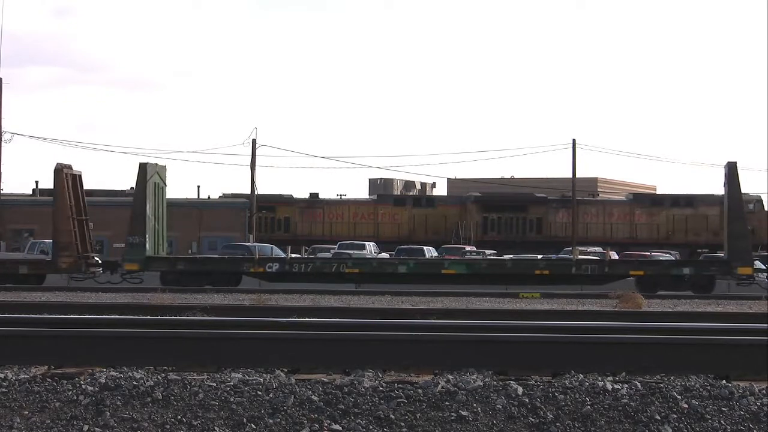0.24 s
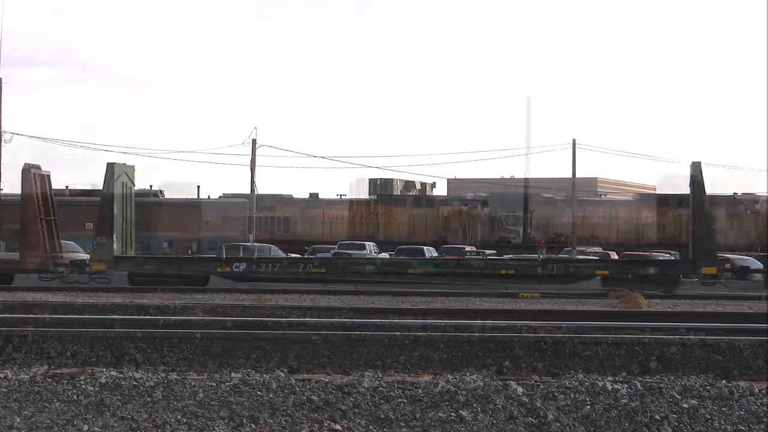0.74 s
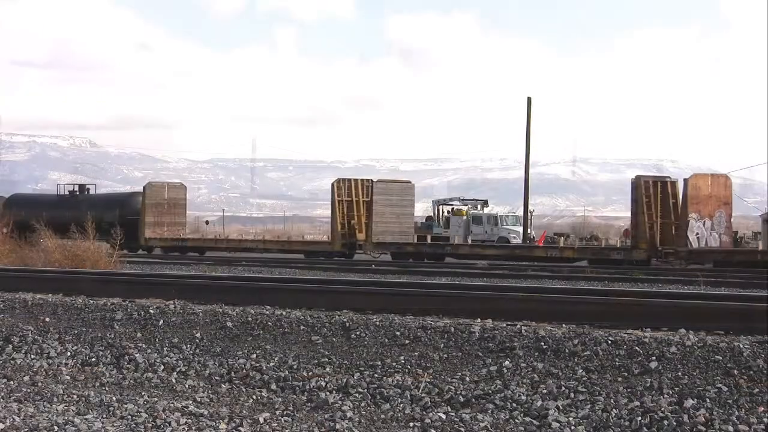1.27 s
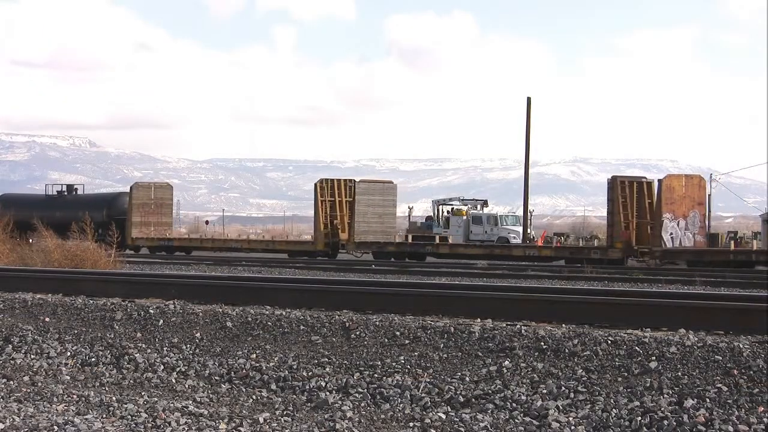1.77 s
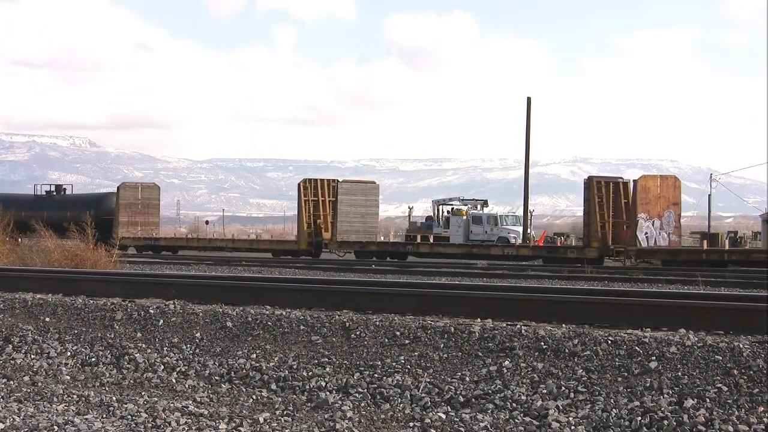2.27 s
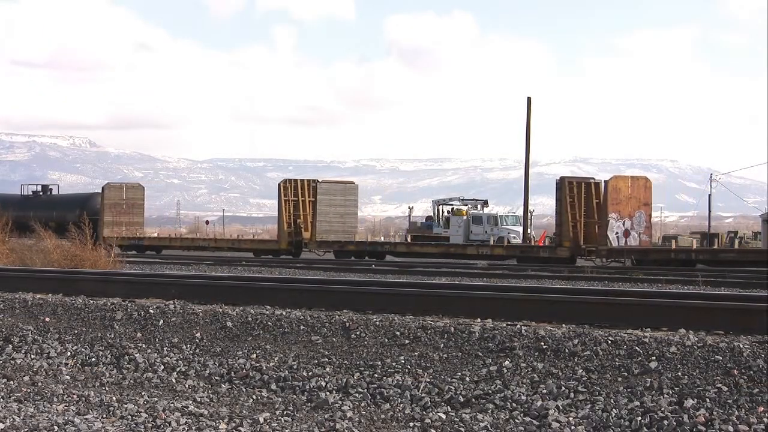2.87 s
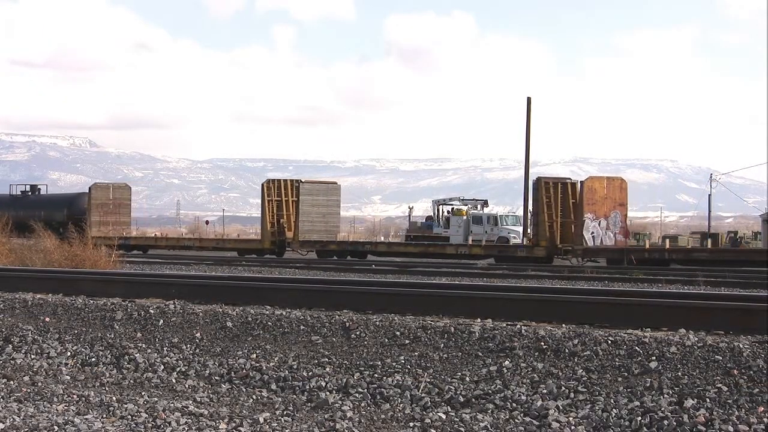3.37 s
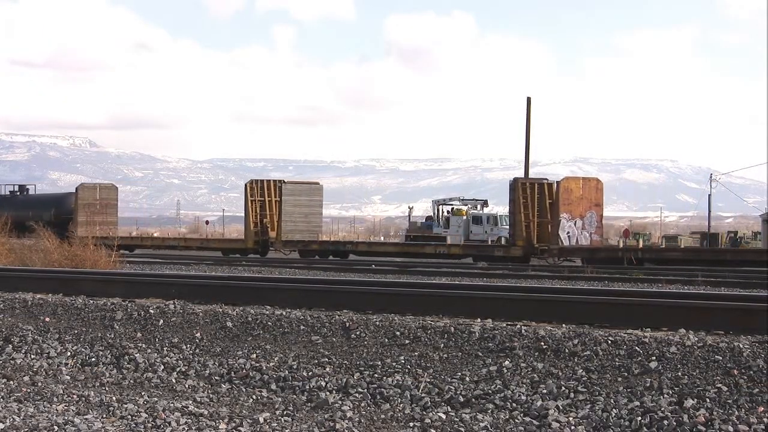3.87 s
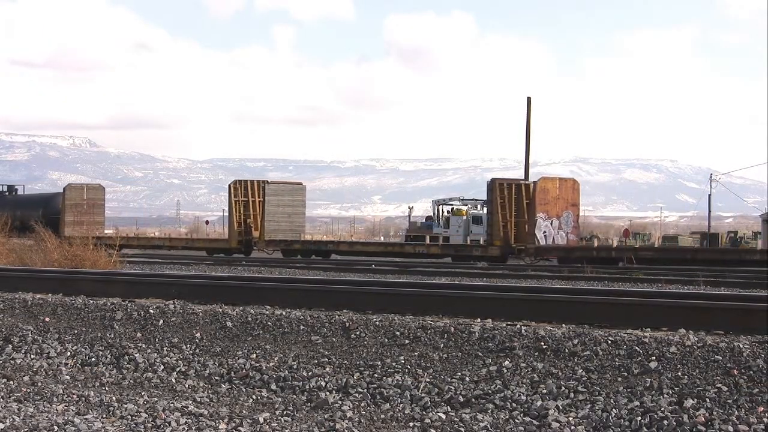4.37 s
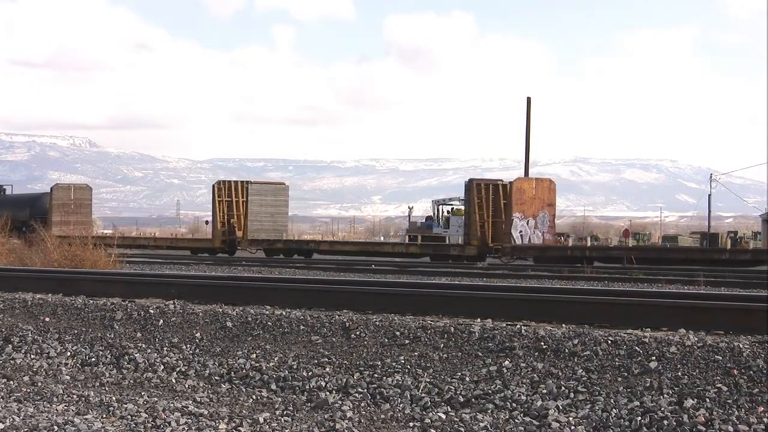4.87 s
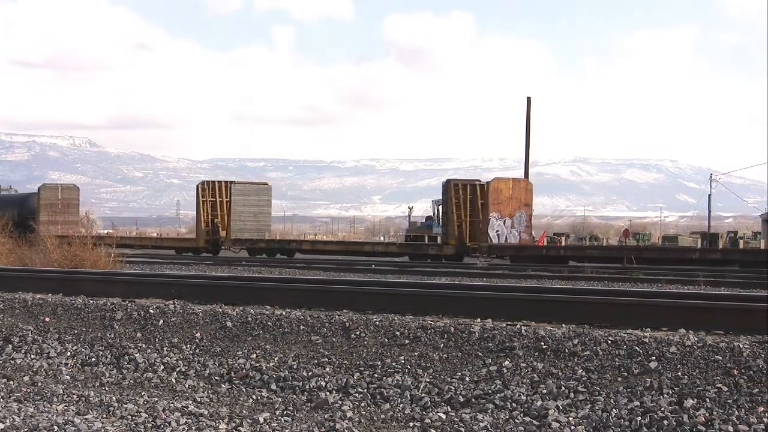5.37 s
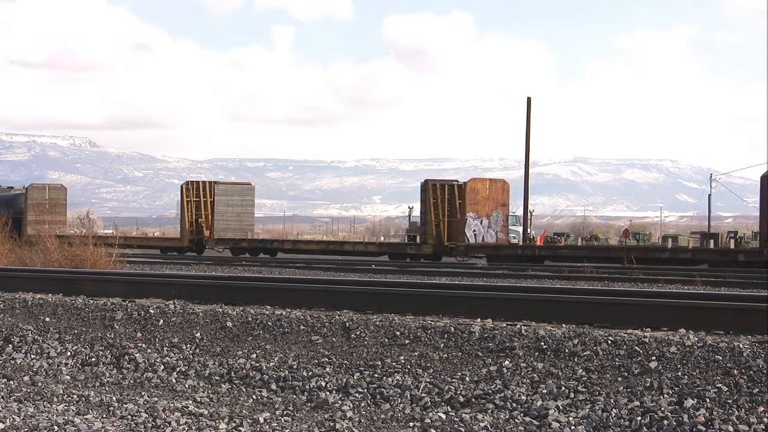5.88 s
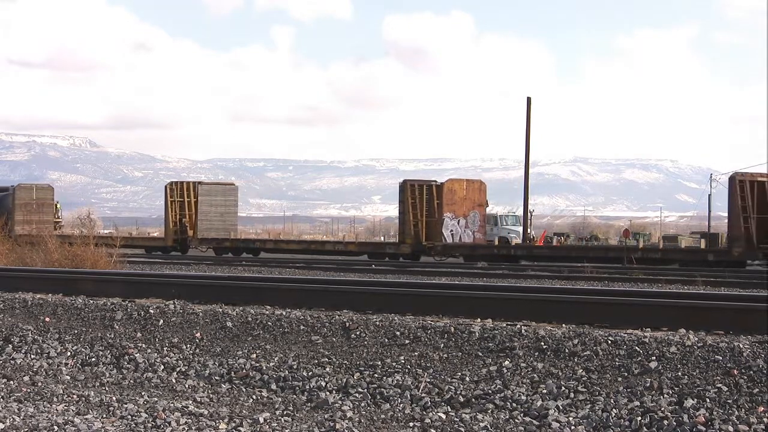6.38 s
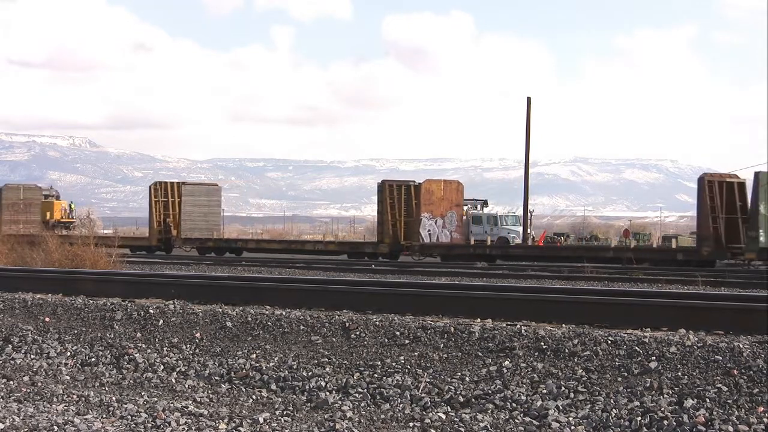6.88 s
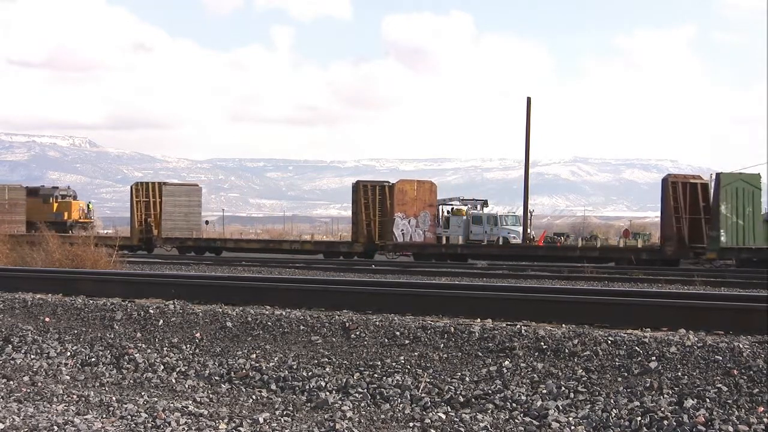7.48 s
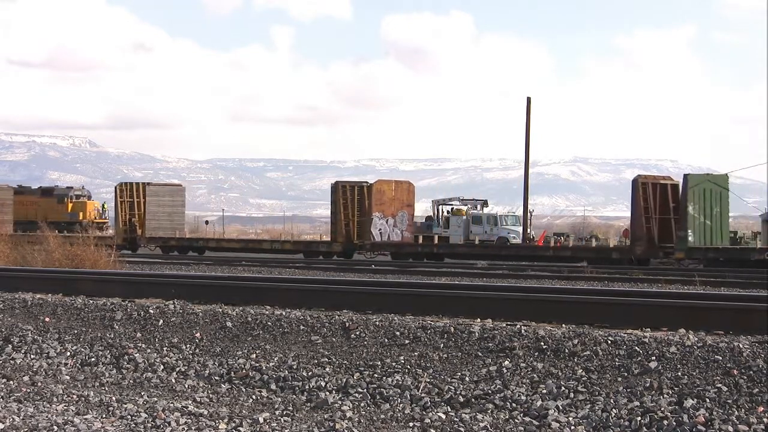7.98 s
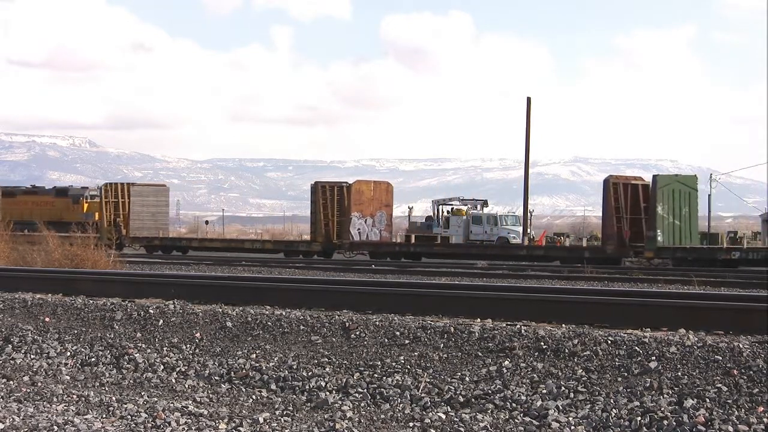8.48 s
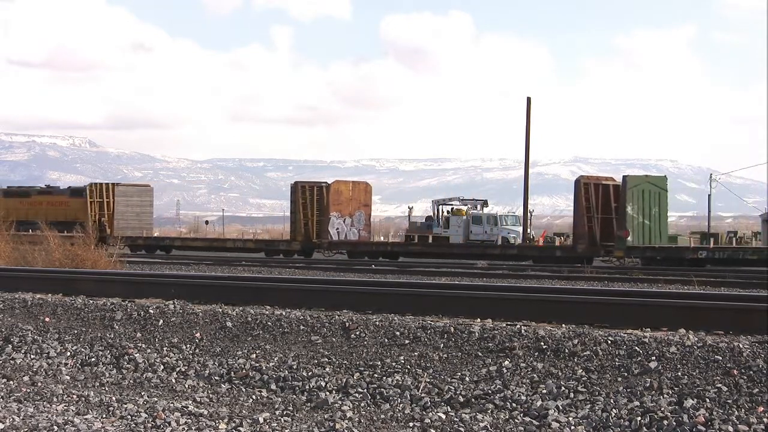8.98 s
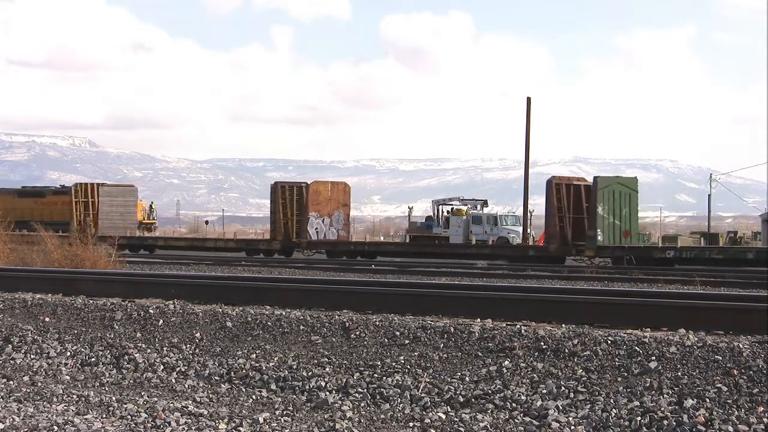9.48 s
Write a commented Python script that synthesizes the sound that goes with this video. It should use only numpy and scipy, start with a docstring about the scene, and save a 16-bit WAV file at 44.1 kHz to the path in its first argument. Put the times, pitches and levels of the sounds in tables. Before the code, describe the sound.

Outdoors in an open rail yard, wind knocks and flutters hard on a small stereo microphone. Beneath it, distant diesel locomotives idle in deep, swelling drones. A thin wavering wheel squeal sounds in the first second, then freight cars roll slowly by with a muffled roar and soft steel hiss, ending in short metallic grinding.

```python
"""Wind thumps and flutters against the two ports of a small stereo microphone, over a deep engine rumble.
Diesel engines idle as deep notes that swell and fade: one at first, then two higher ones take over.
A train rolls slowly past: its wheels roar and hiss as shaped noise with ringing resonances.
Wheel flanges sing as wavering tones and grind as noise through narrow resonances.
The wind is noise in uneven lumps with short knocks; a few tiny ticks of bright noise are heard too."""
import sys
import numpy as np
from scipy import signal
from scipy.fft import rfft, irfft, next_fast_len
from scipy.io import wavfile
from scipy.ndimage import uniform_filter1d

SR = 44100
rng = np.random.default_rng(int(sys.argv[2]) if len(sys.argv) > 2 else 0)


def int16_out(signal):
    """Quantize to a 16-bit WAV file."""
    q = np.round(np.clip(np.atleast_2d(signal).T, -1, 1) * 32767)
    wavfile.write(sys.argv[1], SR, q.astype(np.int16))


N = 429534   # length in samples
TIME = np.arange(N) / SR   # seconds

# In the columns below, "rel. level" is a level before a fixed trim or further shaping in its function.
# A colour gives only the shape of a spectrum: its density at each frequency.

# Exhaust notes of the two nearer engines: (start t/s, end t/s, pitch f/Hz, peak level/dB)
EXHAUST_SWELLS = [(0.1, 0.765, 63.7, -27.5), (0.59, 1.2, 65, -21), (1.056, 2.065, 75.06, -24.5),
                  (2.55, 3.565, 75.42, -17), (3.45, 4.042, 76.05, -26), (3.91, 5.304, 74.35, -18),
                  (5.465, 6.964, 75.46, -16), (7.229, 9.182, 75.8, -15.5), (8.953, 9.9, 74.7, -27.5)]
SWELL_SHAPE = 0.5   # power of the sine arch of each swell
# A farther engine drones on: start, pitch, level and how far the level wavers
FAR_FROM_S, FAR_HZ, FAR_DB, FAR_WAVER_DB = 1.66, 83.1, -28.5, -4
# Low rumble of the yard: (t/s, rel. level/dB)
RUMBLE_LEVEL = [(0.0, -34.5), (0.5, -34.5), (0.9, -29.5), (1.3, -37.5), (2.15, -27.5), (3.2, -26),
                (4.3, -26.5), (4.85, -30), (5.5, -26.5), (9.74, -26.5)]
# Colour of the rumble: (f/Hz, density level/dB)
RUMBLE_COLOUR = [(14, -20), (26, -13.5), (48, -2), (66, 2.5), (82, 4.5), (112, -1.5), (160, -4), (255, -12),
                 (410, -18), (820, -42)]
# Engine resonances that churn in the rumble: (f/Hz, rel. level/dB)
CHURN_MODES = [(140, -0.5), (168, 1.5), (220, -3), (280, -4), (350, -11.5)]
CHURN_DB = -4   # added to the rumble's table level
# How alike left and right are for distant sound: (f/Hz, correlation)
DISTANT_LIKENESS = [(62, 0.77), (255, 0.96), (540, 1), (1020, 0.85), (1850, 0.53), (2650, 0.44),
                    (3350, 0.94), (9100, 1)]

# Rolling cars: (t/s, wheel roar rel. level/dB, hiss of steel rubbing on steel rel. level/dB)
ROLLING = [(0.0, -51.5, -63.5), (0.46, -41, -58.5), (0.76, -36, -50.5), (1.4, -43.5, -59.5),
           (1.75, -42, -59), (1.95, -35, -53), (2.41, -33, -51), (2.56, -35.5, -53.5), (2.8, -36, -54.5),
           (2.92, -35, -52), (4.31, -32.5, -50), (4.45, -35, -51), (4.59, -29, -53), (4.66, -33, -48),
           (4.69, -35.5, -54.5), (4.87, -32, -48.5), (4.96, -35.5, -51), (5.07, -34, -52.5),
           (5.45, -33.5, -47.5), (5.83, -35, -53.5), (6.1, -35.5, -48.5), (6.35, -30, -50.5),
           (6.48, -34, -50.5), (6.75, -31, -49.5), (8.14, -32, -52), (8.87, -29.5, -50),
           (9.09, -31.5, -47.5), (9.36, -30, -47), (9.6, -32.5, -49.5), (9.74, -29, -43.5)]
# Colour of the roar: (f/Hz, density level/dB)
ROAR_COLOUR = [(155, -12), (360, -11.5), (510, -3.5), (630, -2.5), (780, -2.5), (1050, -6), (1480, -11),
               (2020, -20.5), (2850, -36), (5100, -55)]
# Colour of the hiss: (f/Hz, density level/dB)
HISS_COLOUR = [(1050, -9.5), (2250, 4.5), (3150, 1), (4250, -5.5), (5250, -9.5), (7100, -14.5),
               (10100, -20)]
# How strongly the wheels ring as the train rolls on: (t/s, level against the roar/dB)
ROAR_RING = [(0, -10), (3, -9), (4.6, -5.5), (6, -8), (7.3, -10), (8.3, -2), (9, -10), (9.74, -9)]
# Resonances that ring in the roar: (f/Hz, rel. level/dB)
RING_MODES = [(680, -3), (755, -0.5), (820, -2), (940, -3.5), (1080, -10), (1480, -13), (1700, -13)]
# Wheels rub harder for a moment and the hiss flares: (start t/s, end t/s, rel. level/dB)
RUBS = [(4.046, 4.353, -55), (8.686, 8.953, -49), (9.246, 9.35, -45)]
# Gain on the left-right difference of the passing cars: (t/s, roar level/dB, hiss level/dB)
SPREAD = [(0.8, 5.5, -11), (2.2, -4.5, -0.5), (3.8, -6.5, 2), (5.2, -1.5, 2), (6.6, 3.5, -1.5),
          (9.74, 2.5, -1)]

# A flange sings in short spurts, later squeaks twice:
# (start t/s, end t/s, pitch f/Hz, rel. level/dB, octave above against the main tone rel. level/dB)
SQUEALS = [(0.555, 0.7, 1144, -39.5, -17), (0.69, 0.775, 1136, -37, -9), (0.755, 0.85, 1140, -42, -11),
           (0.865, 0.935, 1147, -37, -18), (0.915, 0.975, 1136, -38, -12), (0.965, 1.03, 1130, -32, -18),
           (1.005, 1.105, 1138, -37, -19), (1.098, 1.14, 1130, -39.5, -20), (1.13, 1.255, 1130, -35, -26),
           (1.275, 1.365, 1133, -45, -20), (6.8, 6.9, 3249, -47, -28), (6.89, 7.0, 3247, -46.5, -28)]
SQUEAL_WAVER_HZ, SQUEAL_JITTER_HZ = 8, 19   # slow and fast unsteadiness of the pitch
# A lighter touch sizzles on high resonances: (start t/s, end t/s, centre f/Hz, width f/Hz, rel. level/dB)
SCRAPES = [(6.9, 8.0, 7000, 380, -66.5), (6.92, 7.97, 6230, 450, -67.5), (7.45, 8.0, 7600, 600, -68)]
# Flanges grind against the rail in jerks: (start t/s, end t/s, rel. level/dB)
GRINDS = [(6.12, 6.25, -59.5), (8.722, 8.777, -47), (8.768, 8.89, -48), (8.872, 8.95, -55),
          (9.256, 9.297, -42), (9.285, 9.433, -54.5), (9.42, 9.477, -44), (9.474, 9.532, -46),
          (9.515, 9.59, -50), (9.57, 9.647, -54)]
# Wheel resonances that the grinding excites: (centre f/Hz, width f/Hz, rel. level/dB)
WHEEL_MODES = [(3470, 26, -1), (3655, 110, -7), (3957, 32, -4.5), (4066, 20, -2), (4300, 380, -7.5),
               (6980, 120, -14)]

# Strong gusts on the ports: (start t/s, length t/s, rel. level/dB, left minus right level/dB)
GUSTS = [(0.002, 0.061, -24.5, -15), (0.094, 0.045, -28, -17), (0.171, 0.065, -23.5, -9.5),
         (0.299, 0.046, -30.5, -13), (0.622, 0.027, -32, 3), (0.729, 0.04, -18.5, -2),
         (0.841, 0.058, -18, 1), (0.929, 0.11, -20.5, -2.5), (1.117, 0.068, -13, -1),
         (1.376, 0.055, -15.5, 2.5), (1.43, 0.026, -15.5, -1), (1.548, 0.03, -17, 2.5),
         (1.606, 0.039, -18, 0.5), (1.67, 0.063, -14.5, 3), (1.837, 0.019, -39, 0), (2.16, 0.076, -21.5, 3),
         (2.397, 0.11, -13, 2.5), (2.524, 0.047, -12, 2), (2.657, 0.024, -19, -2),
         (2.704, 0.045, -9.5, 2.5), (2.99, 0.11, -17.5, -3.5), (3.125, 0.11, -17, -1),
         (3.357, 0.11, -17, 0), (3.496, 0.17, -23.5, -6), (3.891, 0.032, -7, 9), (4.087, 0.12, -26, -3),
         (4.224, 0.14, -15.5, -5), (4.635, 0.082, -13, 2), (4.836, 0.089, -16.5, 1), (5.03, 0.046, -12, 6),
         (5.283, 0.11, -17.5, -2.5), (5.49, 0.016, -11.5, -7), (5.71, 0.047, -12, 1),
         (5.78, 0.073, -10, 1.5), (5.984, 0.03, -9.5, 2), (6.081, 0.025, -14, 8), (6.18, 0.071, -24, -2),
         (6.418, 0.12, -16.5, -0.5), (6.742, 0.12, -26, -8), (6.993, 0.053, -29, -15),
         (7.508, 0.044, -17, -1), (7.655, 0.029, -14.5, 3.5), (7.93, 0.039, -17, 5), (8.033, 0.11, -26, 3),
         (8.517, 0.026, -12.5, 10), (8.763, 0.072, -13, 1.5), (9.004, 0.04, -15, -6.5),
         (9.06, 0.048, -20.5, -1), (9.185, 0.18, -16.5, 3.5), (9.44, 0.026, -8.5, 4.5),
         (9.615, 0.1, -19.5, 5)]
# Brightness of the wind: (t/s, tilt level per octave/dB)
WIND_TILT = [(0.0, 4), (0.25, 10.5), (1.1, 5), (2.2, -0.5), (8.5, -3.5), (9.2, -2.5), (9.74, -4.5)]
# The breeze between the strong gusts: (t/s, rel. level/dB)
BREEZE = [(0, -27), (0.5, -56), (0.8, -33.5), (1.3, -36), (2.0, -43), (3.0, -27.5), (4.5, -33.5),
          (6.6, -23.5), (7.3, -41.5), (7.8, -32), (8.45, -50), (9.1, -20.5), (9.74, -40.5)]
BREEZE_WAVER_DB, EDDIES_PER_S = 7.5, 6.5   # size and pace of its unevenness
# Colour of the buffeting: (f/Hz, density level/dB)
WIND_COLOUR = [(15, -31), (27, -8), (70, 0), (135, 7), (220, -1.5), (320, -5.5), (500, -17.5), (770, -29),
               (1500, -45), (3000, -66.5), (6000, -85)]
# How alike left and right are for the wind, negative for opposite phase: (f/Hz, correlation)
WIND_LIKENESS = [(42, -0.92), (130, -0.8), (250, -0.61), (600, -0.86), (1250, -0.12)]
# Single eddies thump on the microphone: (t/s, rel. level/dB, pitch f/Hz, left minus right level/dB)
THUMPS = [(0.004, -15, 150, -5), (0.026, -15, 190, -12), (0.128, -28, 210, -2), (0.196, -7, 353, -15),
          (0.23, -14, 192, -6), (0.311, -15.5, 202, -5), (0.33, -20, 240, -5), (0.636, -13, 286, -5),
          (0.749, -10, 172, -1), (0.859, -9, 252, 9), (0.998, -11.5, 443, 2), (1.004, -11, 129, 3),
          (1.126, -14, 140, -3.5), (1.151, -8, 172, -7), (1.175, -12.5, 178, 5), (1.442, -14, 227, 1),
          (1.553, -17, 160, -3), (1.572, -10, 181, -8), (1.613, -20, 194, -4), (1.676, -21, 213, 12),
          (1.698, -15, 190, 3), (1.714, -13, 245, 10), (2.135, -7.5, 120, 2), (2.414, -5.5, 170, -5),
          (2.439, -11, 172, -3), (2.485, -16, 172, -1), (2.546, -14, 213, 4.5), (2.716, -8.5, 189, 13),
          (3.13, -6, 184, -18), (3.511, -8.5, 190, 0), (4.115, -6, 176, -22), (4.244, -9, 316, -11),
          (4.317, -5.5, 170, -3), (4.652, -8, 214, 0), (4.668, -0.5, 150, 24), (5.041, -13, 249, 7),
          (5.069, -9, 195, 9), (5.724, -8, 212, 16), (7.651, -10.5, 177, 2), (8.779, -9, 181, 8),
          (9.06, -12, 190, -3), (9.22, -16, 185, 3), (9.304, -12, 174, -1.0), (9.461, -17, 191, 5),
          (9.642, -10, 203, 2)]
# Thump level trim, time to the top of the envelope, level of the turbulent puff and its upper limit
THUMP_DB, THUMP_RISE_S, PUFF_DB, PUFF_HZ = -5, 0.003, -8, 520
# Tiny ticks: (t/s, rel. level/dB)
TICKS = [(0.032, -47), (0.196, -39.5), (0.9507, -42), (1.1794, -43), (1.3987, -45), (1.575, -41),
         (2.7157, -43), (5.0454, -45), (5.7249, -43), (6.3804, -41), (7.9458, -41), (8.739, -50),
         (9.4978, -50)]

# Limiter: threshold, share of the excess taken off, and how fast the remembered excess falls
LIMIT_DB, LIMIT_SHARE, LIMIT_RELEASE_DB_PER_S = -4.5, 0.81, 39
CUTOFF_HZ = 9900   # top of the output


def locomotives():
    """Idling engines send out exhaust notes that swell, fade and overlap above a broad, churning rumble."""
    far_level = from_db(FAR_DB + FAR_WAVER_DB * drift(0.27))
    notes = exhaust(FAR_HZ) * swell(FAR_FROM_S, np.inf, edge=0.19) * far_level
    for start, end, hz, db in EXHAUST_SWELLS:
        progress = np.clip((TIME - start) / (end - start), 0, 1)
        arch = abs(np.sin(np.pi * progress)) ** SWELL_SHAPE
        notes = notes + exhaust(hz) * from_db(db) * arch
    rumble_db, = in_time(RUMBLE_LEVEL)
    rumble = uneven_noise(RUMBLE_COLOUR, DISTANT_LIKENESS, patchy_db=1.0, rate=7.0)
    rumble = from_db(rumble_db + 6.0) * rumble
    churn = wandering_modes(CHURN_MODES, blur_hz=13, wander=0.03, patchy_db=5)
    churn = from_db(rumble_db + CHURN_DB) * churn
    # the notes lean slightly to the left
    return notes * from_db([[.7], [-.7]]) + rumble + churn


def exhaust(hz):
    """From afar the exhaust pulses blur into one deep note; uneven firing makes it throb a little."""
    pitch = hz * (1 + .002 * drift(1))
    phase = 2 * np.pi * (np.cumsum(pitch) / SR + rng.random())
    return np.sqrt(2) * np.sin(phase) * from_db(.8 * drift(8))


def wheels():
    """Rough treads roar on the rails and set the wheels ringing; rubbing steel adds a fluttering hiss."""
    roar_db, hiss_db = in_time(ROLLING)
    roar_spread_db, hiss_spread_db = in_time(SPREAD)
    ring_db, = in_time(ROAR_RING)
    ring = wandering_modes(RING_MODES, blur_hz=16, wander=0.018, patchy_db=4.5)
    roar = uneven_noise(ROAR_COLOUR, DISTANT_LIKENESS, patchy_db=0.92, rate=34)
    roar = roar + from_db(ring_db) * ring
    flares = sum(from_db(db + 2.0) * swell(start, end, edge=0.096) for start, end, db in RUBS)
    rubbing = from_db(hiss_db + 2) + flares
    hiss = rubbing * uneven_noise(HISS_COLOUR, DISTANT_LIKENESS, patchy_db=0.9, rate=59)
    flutter = from_db(0.7 * drift(29))
    hiss = hiss * flutter * from_db([[-.8], [.8]])   # slightly to the right
    return from_db(roar_db + 0.5) * widen(roar, roar_spread_db) + widen(hiss, hiss_spread_db)


def flanges():
    """Flanges squeal, grind against the rail in jerks that ring the wheel, or only sizzle."""
    squeals = sum(squeal(*row) for row in SQUEALS)
    jerks = from_db(4 * np.tanh(drift(35)))
    sizzle = 0
    for start, end, hz, width_hz, db in SCRAPES:
        ringing = rms_one(resonate(rng.standard_normal(N), hz, width_hz))
        sizzle = sizzle + ringing * jerks * swell(start, end, edge=.045) * from_db(db)
    # the same friction noise drives every wheel resonance
    friction = rng.standard_normal(N)
    wheel = 0
    for hz, width_hz, db in WHEEL_MODES:
        wheel = wheel + from_db(db) * rms_one(resonate(friction, hz, width_hz))
    pressure = sum(from_db(db) * swell(start, end, edge=0.03) for start, end, db in GRINDS)
    return squeals + sizzle + wheel * np.sqrt(jerks) * pressure


def squeal(start, end, hz, db, octave_db):
    """A flange that sticks and slips locks onto one wavering wheel mode for a moment, then loses it."""
    pitch = hz + SQUEAL_WAVER_HZ * drift(15) + SQUEAL_JITTER_HZ * drift(150)
    phase = 2 * np.pi * np.cumsum(pitch) / SR
    octave_gain = from_db(octave_db + 3 * np.tanh(drift(30)))
    tone = np.sin(phase) + octave_gain * np.sin(2 * phase)
    flutter = from_db(4 * np.tanh(drift(60)) - 1)
    return tone * flutter * swell(start, end, edge=.032) * from_db(db)


def wind():
    """Eddies hit the two ports in lumps, mostly in opposite phase; gusts stand out of a wavering breeze."""
    breeze_db, = in_time(BREEZE)
    breeze = from_db(breeze_db + BREEZE_WAVER_DB * np.tanh(drift(EDDIES_PER_S)))
    shapes = np.array([swell(start - .008, start + length + 0.022, edge=0.026)
                       for start, length, *_ in GUSTS])
    _, _, gust_db, pan_db = np.transpose(GUSTS)
    port_gains = from_db(np.outer([1, -1], pan_db) / 2) * from_db(gust_db - 2.5)
    gusts = port_gains @ shapes
    tilt_db, = in_time(WIND_TILT)
    lumps = np.tanh(drift(45))
    out = 0
    for hz, band in noise_bands(WIND_COLOUR, WIND_LIKENESS):
        octaves = np.clip(np.log2(hz / 200), -2.2, 1.5)   # above or below 200 Hz
        # small eddies come in sharper bursts than large ones
        bursts = from_db((4.5 + 1.4 * octaves) * lumps + 1.5)
        out = out + band * bursts * (gusts + breeze) * from_db(tilt_db * octaves)
    return out


def thumps():
    """An eddy that strikes both ports at once is a short pressure wave with a puff of turbulence."""
    out = np.zeros((2, N + SR))
    age = TIME[:SR // 10]
    envelope = age / THUMP_RISE_S * np.exp(1 - age / THUMP_RISE_S)
    dull = signal.butter(3, PUFF_HZ, fs=SR, output="sos")
    for s, db, hz, pan_db in THUMPS:
        puff = rms_one(signal.sosfilt(dull, rng.standard_normal(len(age))))
        knock = envelope * (np.sin(2 * np.pi * hz * age) + from_db(PUFF_DB) * puff)
        ports = rms_one(from_db(np.array([[pan_db], [-pan_db]]) / 2))
        out[:, round(s * SR):][:, :len(age)] += knock * ports * from_db(db + THUMP_DB)
    return out[:, :N]


def ticks():
    """Tiny ticks: each a burst of bright noise that dies away in milliseconds."""
    out = np.zeros(N)
    for s, db in TICKS:
        first = round(s * SR)
        age = TIME[:N - first][:SR // 20]
        tick = np.exp(-age / 0.0021) * rng.standard_normal(len(age))
        out[first:][:len(age)] += from_db(db + 0.5) * tick
    return resonate(out, hz=6200, width_hz=8000)


def uneven_noise(colour, likeness, patchy_db, rate):
    """Noise whose octaves each swell and fade on their own."""
    return sum(band * from_db(patchy_db * drift(rate)) for hz, band in noise_bands(colour, likeness))


def noise_bands(colour, likeness):
    """Stereo noise of the given colour in overlapping octaves, as (centre Hz, band); total power 1."""
    size = next_fast_len(N, real=True)
    hz = np.maximum(np.fft.rfftfreq(size, 1 / SR), 1)
    lowest, highest = colour[0][0] / 2, 2 * colour[-1][0]
    centres = [c for c in 20 * 2. ** np.arange(10) if lowest < c < highest]
    shares = [np.maximum(1 - abs(np.log2(hz / c)), 0) for c in centres]
    gain = from_db(at_hz(colour, hz))
    gain = gain / np.sqrt(np.mean((gain * sum(shares)) ** 2))
    alike = np.clip(at_hz(likeness, hz), -.99, .99)
    mid, side = rfft(rng.standard_normal((2, size))) * gain
    # mixing a shared and an opposed part sets the left-right correlation
    both = np.sqrt((1 + alike) / 2) * mid + np.sqrt((1 - alike) / 2) * side * [[1], [-1]]
    return [(c, irfft(both * share, size)[:, :N]) for c, share in zip(centres, shares)]


def wandering_modes(modes, blur_hz, wander, patchy_db):
    """Narrow resonances that each stray in pitch and come and go on their own; total power 1."""
    out = 0
    for hz, db in modes:
        phase = 2 * np.pi * np.cumsum(hz * (1 + wander * drift(2))) / SR
        ringing = drift(blur_hz) * np.cos(phase) + drift(blur_hz) * np.sin(phase)
        out = out + ringing * from_db(db + patchy_db * np.tanh(drift(4)))
    return rms_one(out)


def resonate(x, hz, width_hz):
    """One resonance with unit gain at its top."""
    r = np.exp(-np.pi * width_hz / SR)
    top = np.array([1, 0, -1]) * (1 - r * r) / 2
    return signal.lfilter(top, [1, -2 * r * np.cos(2 * np.pi * hz / SR), r * r], x)


def drift(rate):
    """Smooth random wandering with spread 1, changing about `rate` times a second."""
    # made at one point per 40 samples, then joined by straight lines
    r = np.exp(-80 * np.pi * rate / SR)
    chance = rng.standard_normal(N // 40 + 2002)
    slow = signal.lfilter([1], [1, -2 * r, r * r], chance)[2000:]   # skip the settling
    return np.interp(np.arange(N) / 40, np.arange(len(slow)), rms_one(slow))


def swell(start, end, edge):
    """Rises after start and falls before end, each within `edge` seconds."""
    return np.clip(np.minimum(TIME - start, end - TIME) / edge, 0, 1)


def widen(x, db):
    """Scale the difference between left and right by a gain in dB."""
    mid = x.mean(axis=0)
    return mid + (x - mid) * from_db(db)


def in_time(rows):
    """Each column of a curve, at every sample."""
    s, *columns = np.transpose(rows)
    return [np.interp(TIME, s, column) for column in columns]


def at_hz(points, hz):
    """Read a spectrum on a log-frequency axis."""
    points = np.array(points)
    return np.interp(np.log(hz), np.log(points[:, 0]), points[:, 1])


def from_db(db):
    """Decibels to gain."""
    return np.exp(np.asarray(db) * (np.log(10) / 20))


def rms_one(x):
    """Scale to unit power."""
    return x / np.sqrt(np.mean(x ** 2) + 1e-20)


def limiter(x):
    """Loud peaks push the gain down at once, on both sides alike; it recovers steadily."""
    peak_db = 20 * np.log10(abs(x).max(axis=0) + 1e-9)
    over_db = np.maximum(peak_db - LIMIT_DB, 0)
    recovery_db = LIMIT_RELEASE_DB_PER_S * TIME
    held_db = np.maximum.accumulate(over_db + recovery_db) - recovery_db
    return x * from_db(-LIMIT_SHARE * uniform_filter1d(held_db, size=128))


def scene():
    """Engines and train out in the yard, wind right at the microphone, and a few ticks."""
    return locomotives() + wheels() + flanges() + wind() + thumps() + ticks()


def record(dry):
    """The recorder drops the deepest rumble, limits and rounds the tallest peaks and cuts the top steeply."""
    faded_in = dry * swell(0, np.inf, edge=0.0028)
    lean = signal.sosfilt(signal.butter(2, 19, "high", fs=SR, output="sos"), faded_in)
    held = limiter(lean)
    rounded = held / (1 + (held / .72) ** 6) ** (1 / 6)   # never beyond 0.72
    return signal.sosfilt(signal.ellip(12, .1, 90, CUTOFF_HZ, fs=SR, output="sos"), rounded)


dry = scene()
out = record(dry)
int16_out(out)
```